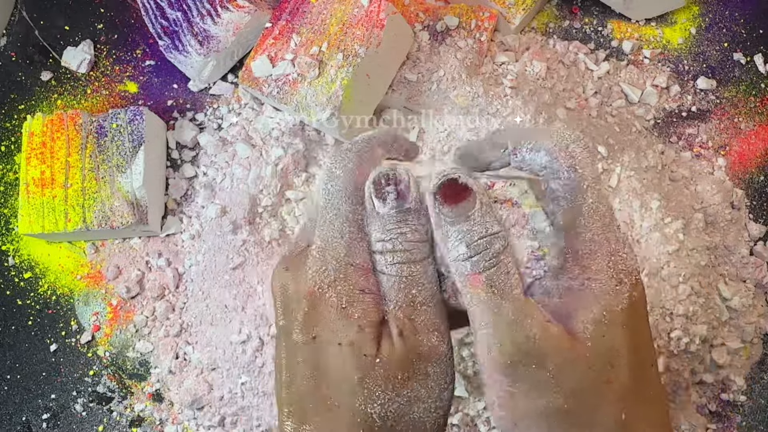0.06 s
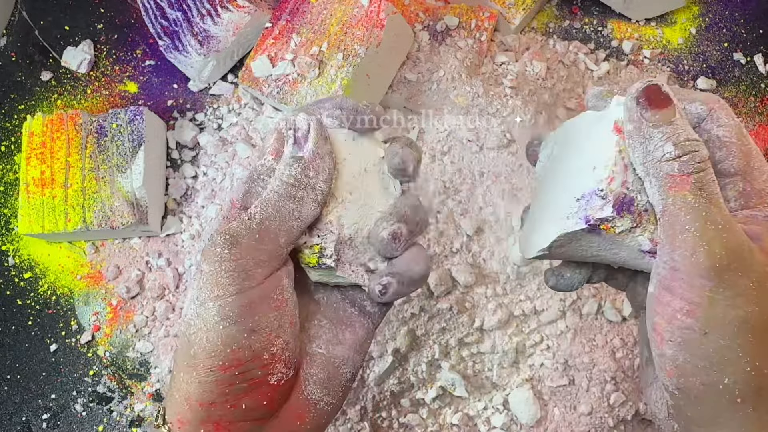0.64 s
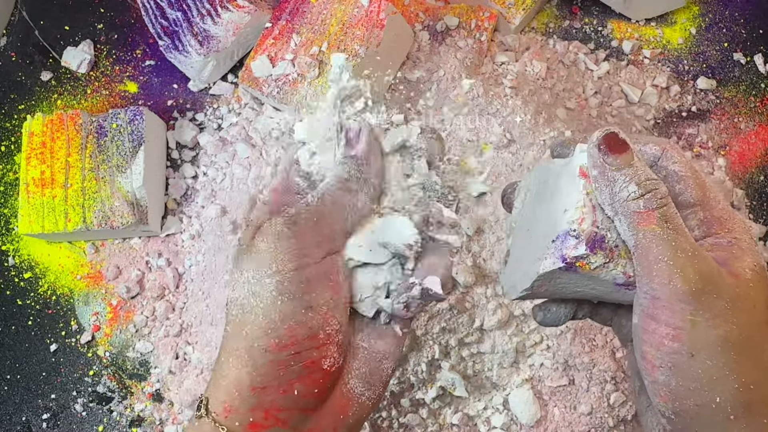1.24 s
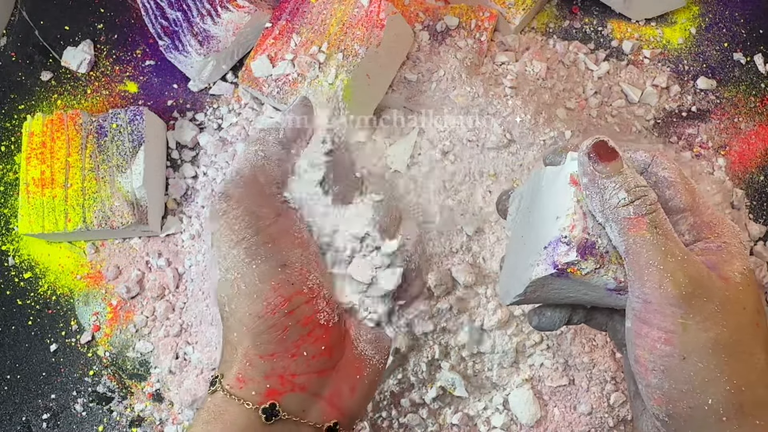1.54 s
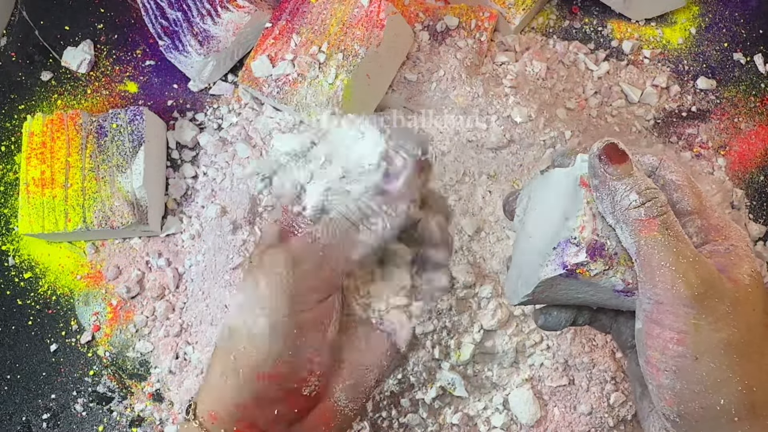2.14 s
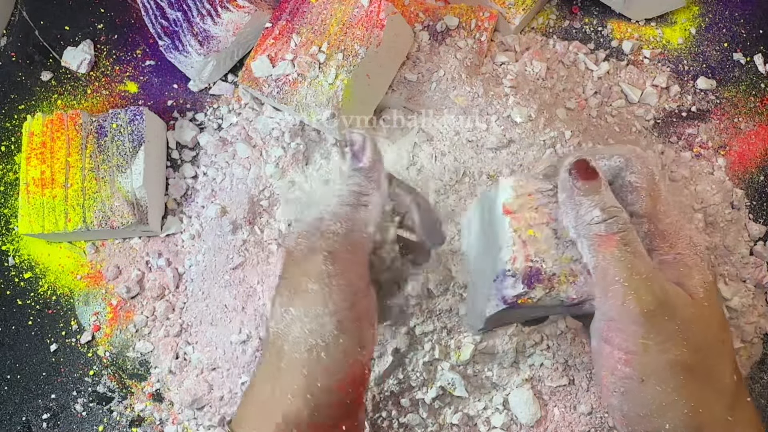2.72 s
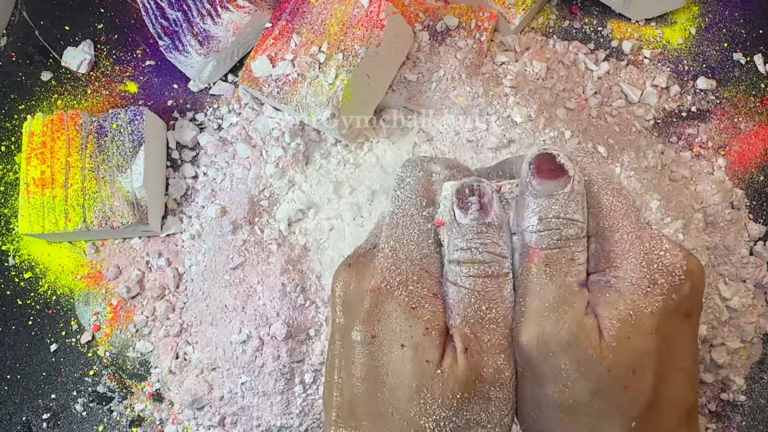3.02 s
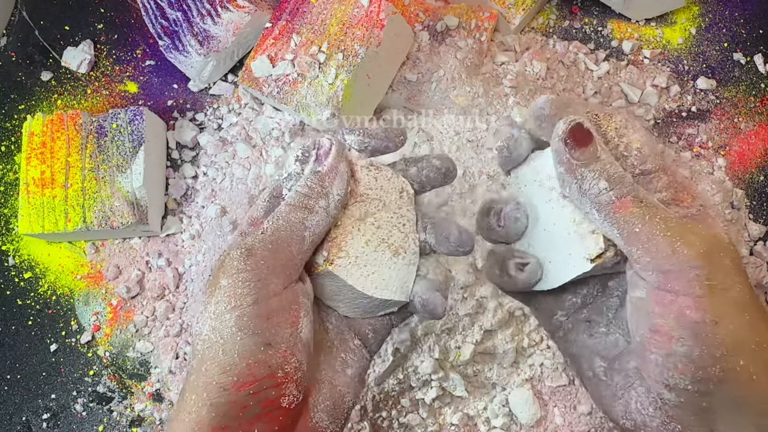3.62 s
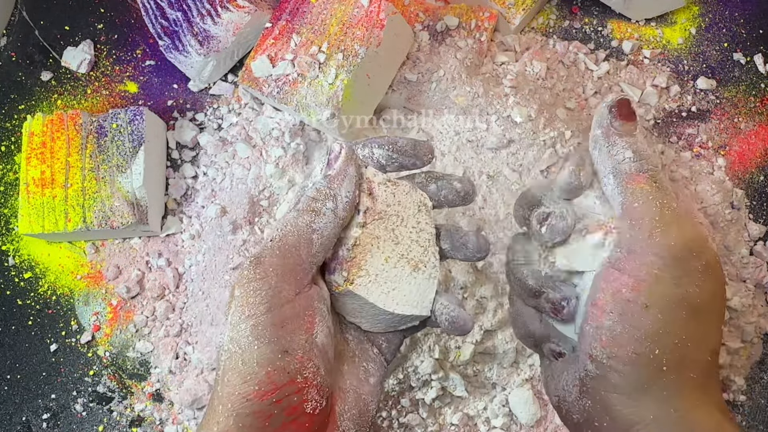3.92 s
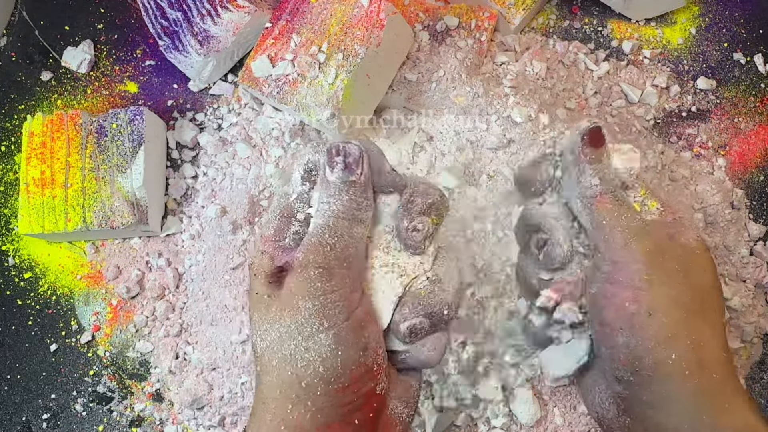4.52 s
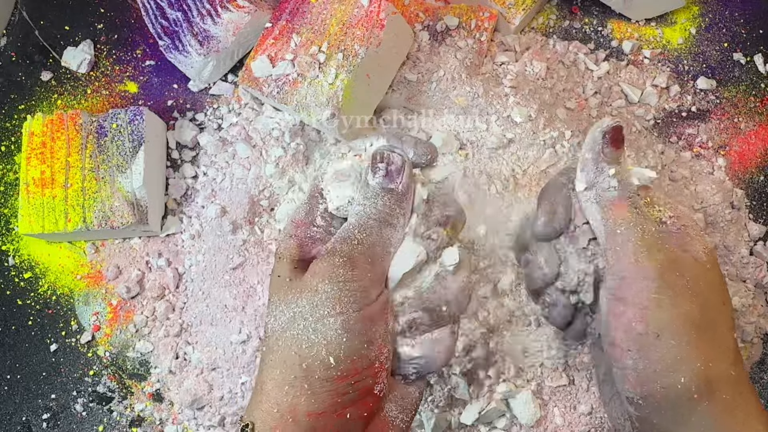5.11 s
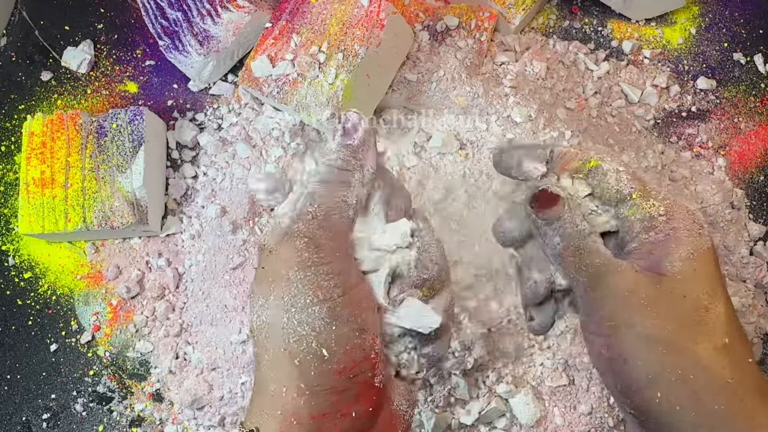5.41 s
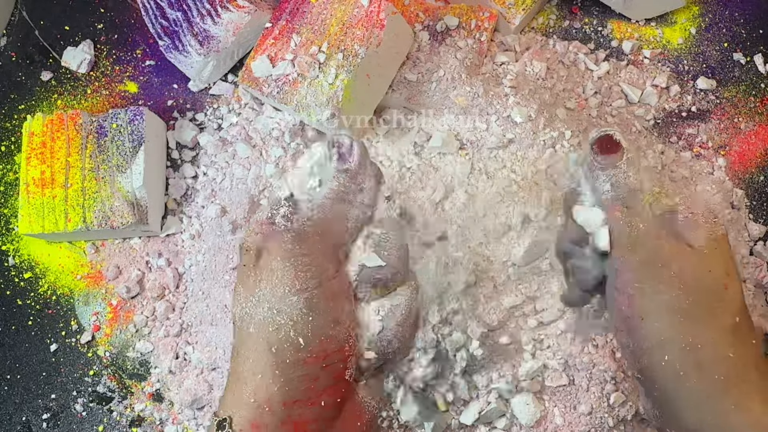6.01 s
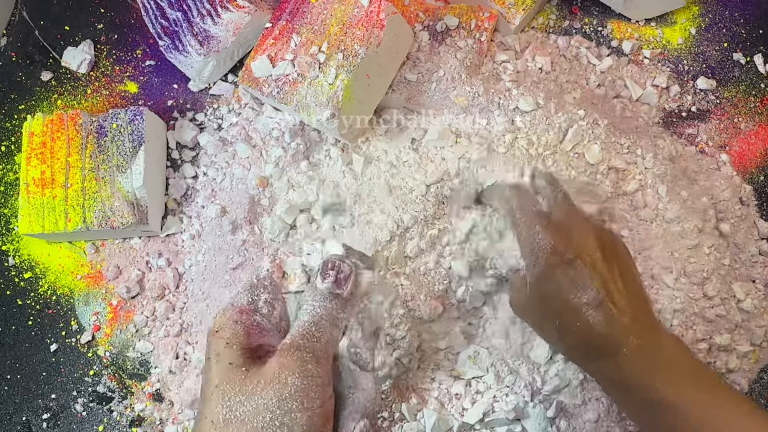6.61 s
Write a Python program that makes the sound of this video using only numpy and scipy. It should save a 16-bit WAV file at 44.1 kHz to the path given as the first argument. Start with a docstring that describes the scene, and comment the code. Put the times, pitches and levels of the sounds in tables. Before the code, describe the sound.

Hands snap dry chalk blocks close to a stereo microphone in a small, dead space. Sharp cracks with a hollow knock and a short low ring give way to gritty crunching as the pieces are squeezed, and lumps thud softly into powder. After a quieter spell of crumbling, another block snaps and dense crackling follows. At the end, fingers rake through the loose rubble.

```python
"""A small, dead space, with a stereo microphone close to a heap of chalk powder.
Two hands snap dry blocks and crumble the pieces: sharp cracks stand over a gritty crunch of tiny
fractures. Lumps thud into the powder, and at the end a hand rakes through the heap.
The space answers with one strong low ring, and the hardest snaps overload the microphone."""
import sys
import numpy as np
from scipy import signal
from scipy.io import wavfile
from scipy.ndimage import uniform_filter1d

SR = 44100
rng = np.random.default_rng(int(sys.argv[2]) if len(sys.argv) > 2 else 0)


def store_wav(level_fs):
    """Save 16-bit WAV to argv[1]."""
    pcm = np.round(np.clip(np.atleast_2d(level_fs), -1, 1) * 32767)
    wavfile.write(sys.argv[1], SR, pcm.T.astype(np.int16))


N = 297665  # sources are mid-side pairs; table levels are relative, ahead of each layer's gain

# The loudest cracks, close to the microphone: start_s, snap_db, knock_db
CRACKS = [(0.12, -16, -49), (0.1876, -24, -57), (0.2096, 8.5, -1), (0.634, -16, -30), (0.659, -11, -25),
          (0.6891, -4, -14.5), (0.6989, 3.5, -35), (0.7336, -8, -51), (0.7766, 4.5, -14),
          (0.7939, 0, -12.5), (0.8154, -7, -40), (0.8348, -9.5, -31), (0.8893, -16, -23.5),
          (0.8965, -5, -27), (0.9218, -3.5, -21), (1.046, -25, -28.5), (1.092, -17, -34.5),
          (1.3415, -28, -36), (1.3687, -7, -51), (1.4634, -26, -28), (1.4781, -2, -18), (1.985, -37, -34),
          (2.0785, -33, -31), (2.2666, -19, -26.5), (2.3085, -12.5, -22.5), (2.3349, -12.5, -20),
          (2.418, -39, -28), (2.5637, -27.5, -28), (2.722, -27, -37), (2.768, -14, -26.5),
          (2.977, -29, -36.5), (3.015, -20.5, -45), (3.1475, 1.5, -10.5), (3.3777, -20, -50),
          (3.5515, -19, -35), (3.6505, 0.5, -9.5), (3.6554, -6, -20), (3.7559, -2, -10),
          (3.7945, -5.5, -9.5), (3.8, -5, -13), (3.8242, 3.5, -9), (3.8864, -2, -24.5), (3.928, -9, -19),
          (3.9477, -1, -21), (3.9958, -8, -37), (4.0371, -14.5, -35), (4.2558, -24, -26.5),
          (4.294, -12.5, -37), (4.3966, 2.5, -8), (4.4088, 0, -7.5), (4.4816, 0.5, -15.5),
          (4.5425, 3, -18.5), (4.5607, 0, -17.5), (4.567, -0.5, -15), (4.7127, -30, -28.5),
          (4.994, -16.5, -18.5), (5.0653, -24, -28), (5.0843, -19, -24), (5.1095, -16, -20),
          (5.1141, -5.5, -17.5), (5.153, -15.5, -30), (5.2447, -15, -21), (5.2773, -13.5, -22.5),
          (5.3058, -12.5, -22.5), (5.4436, -18, -36), (5.463, -9.5, -16), (5.5561, -4.5, -11.5),
          (5.6877, -15, -39), (5.8713, -18, -23), (5.9254, -26, -23.5), (6.0332, -16, -30),
          (6.0787, -18, -45), (6.538, -12.5, -28.5), (6.6643, -14, -23.5), (6.724, -6, -18.5)]
# Tone of a snap at close range: frequency_hz, level_db
SNAP_SPECTRUM = [(300, -22), (1200, -10), (2700, -1), (4000, -1), (5000, -4), (6300, 1), (8500, -4),
                 (10000, -10), (12300, -21), (15500, -15)]

def snaps(cracks, spectrum, split_s=.0009, splinter_db=-10, splinter_s=.005, strain_db=-16, strain_s=.002):
    """The chalk crackles under strain, splits and sheds splinters; a thin flake goes in one short tick."""
    out = np.zeros((2, N))
    t = np.arange(-SR // 50, SR // 16) / SR  # the split falls at t = 0
    splinters = grains(per_s=900, spread_db=3, life_s=.0004, bed=.08)
    strain = amp(strain_db) * np.exp(-abs(t) / strain_s)
    shedding = np.where(t < 0, strain, amp(splinter_db) * np.exp(-abs(t) / splinter_s))
    for start_s, snap_db, knock_db in cracks:
        thickness = np.clip(amp(.3 * (knock_db + 18)), .4, 1.4)  # thicker pieces knock louder
        width_s = thickness * np.where(t < 0, split_s / 4, split_s)
        split = rng.choice([-1., 1.], (2, len(t))) * np.exp(-abs(t) / width_s) / np.sqrt(thickness)
        bits = splinters.take(round(start_s * SR) + np.arange(len(t)), axis=1, mode="wrap")
        add(out, start_s + t[0], amp(snap_db) * (split + thickness * shedding * bits))
    return colour(out, spectrum)


# Tone of the parting halves at close range: frequency_hz, level_db
KNOCK_SPECTRUM = [(100, -15.5), (250, -12), (600, -2.5), (1200, -1), (1550, -3.5), (2100, 3), (2900, -2.5),
                  (3700, -4.5), (6000, -14.5), (11000, -69)]

def knocks(cracks, level_db, life_s, scrape_db, scrape_s):
    """The halves spring apart with a falling knock, slower for big pieces, their rough faces scraping."""
    out, t = np.zeros((2, N)), np.arange(SR // 20) / SR
    for start_s, _, knock_db in cracks:
        size = np.clip(amp(.233 * (knock_db + 14.5)), .8, 2.2) * rng.uniform(.9, 1.1)
        knock = falling_tone(t, top_hz=3963, end_hz=508, fall_s=.0012 * size)
        knock *= np.exp(-t / (life_s * size))
        scrape = amp(scrape_db) * rng.standard_normal((2, len(t))) * np.exp(-t / scrape_s)
        add(out, start_s, amp(knock_db + level_db) * (np.outer([1, 0], knock) + scrape))
    return colour(out, KNOCK_SPECTRUM)


# Whole blocks breaking in front of the microphone: start_s, thock_db, push_db
BREAKS = [(0.2096, -4, -11), (0.69, -8, -22), (3.148, -1.5, -8), (3.651, -13, -23), (3.756, -14, -23),
          (3.796, -8, -25), (4.3966, -25, -22.5), (4.4088, -10, -24.5)]
# Hollow tone between the palms: frequency_hz, level_db
THOCK_SPECTRUM = [(150, -7), (400, -5), (520, 0.5), (640, 3.5), (800, 4.5), (1100, -1), (2000, -12.5),
                  (6000, -99)]

def thocks(level_db, life_s):
    """A whole block breaking between the palms adds a hollow thock."""
    out, t = np.zeros((2, N)), np.arange(SR // 12) / SR
    for start_s, thock_db, _ in BREAKS:
        burst = np.exp(-t / life_s) * rng.standard_normal((2, len(t)))
        add(out, start_s, amp(level_db + thock_db) * burst)
    return colour(out, THOCK_SPECTRUM)


def flakes(grit_flow, crumb_flow, per_s=16, snap_db=12, knock_db=2, spread_db=4.5):
    """Flakes crack off at random, as strong as the squeeze that sheds them; rows as in CRACKS."""
    rows = []
    for when, size, thickness in rng.random((round(per_s * N / SR), 3)):
        at = int(when * N)
        snap = 20 * np.log10(grit_flow[at]) + snap_db + spread_db * (2 * size - 1)
        knock = 20 * np.log10(crumb_flow[at]) + knock_db + spread_db * (2 * thickness - 1)
        rows.append((at / SR, snap, knock))
    return rows


# Squeezes of the hand above the heap: peak_s, half_length_s, grit_db, crumbs_db, heap_db
SQUEEZES = [(0.035, .06, -44, -54, -63), (0.451, 0.05, -41, -60, -51), (0.692, 0.076, -36.5, -41, -39.5),
            (0.813, 0.045, -27, -34, -35), (0.938, 0.036, -28, -30, -36), (1.171, .07, -39.5, -38.5, -53),
            (1.34, 0.067, -31, -34.5, -49), (1.484, 0.15, -40, -36.5, -36), (1.70, 0.11, -59, -56, -37),
            (1.877, 0.1, -41.5, -35.5, -42), (2.015, 0.14, -43.5, -40, -39.5),
            (2.313, 0.11, -41, -35.5, -34.5), (2.44, 0.059, -64, -39, -49),
            (2.561, 0.072, -44.5, -38.5, -48.5), (2.685, 0.07, -47.5, -53, -69),
            (2.809, 0.051, -42, -43.5, -45), (3.003, 0.045, -51, -47.5, -45.5),
            (3.433, 0.066, -41.5, -47.5, -58), (3.713, 0.09, -38.5, -37.5, -30.5),
            (3.917, 0.12, -34.5, -37, -32.5), (4.179, 0.031, -34.5, -33.5, -37.5),
            (4.27, 0.086, -37, -36.5, -52), (4.473, 0.16, -34.5, -33, -32.5), (4.742, .13, -38, -37, -33),
            (4.963, 0.12, -38.5, -35, -57), (5.113, 0.073, -39.5, -36, -38),
            (5.288, 0.073, -35, -38.5, -39.5), (5.47, 0.14, -42.5, -38.5, -42),
            (5.73, 0.37, -44, -40, -43.5), (5.962, 0.15, -38.5, -39.5, -35.5),
            (6.208, 0.064, -46.5, -39, -33), (6.4, 0.069, -43.5, -36.5, -35), (6.68, 0.17, -46.5, -39, -37)]

def squeezing(layer, touch_db, late_s=0, stretch=1, build_db=9, let_go_db=8, bend=1.55):
    """Flow of grit (layer 0), crumbs (1) or heap unrest (2) as each squeeze builds and lets go."""
    t = np.arange(N // 64 + 2) * 64 / SR
    power = amp(touch_db) ** 2  # fingers never lie quite still on the chalk
    for peak_s, half_length_s, *levels_db in SQUEEZES:
        from_peak = (t - peak_s - late_s) / (half_length_s * stretch)
        drop_db = np.where(from_peak < 0, build_db, let_go_db) * abs(from_peak) ** bend
        power = power + amp(levels_db[layer] - drop_db) ** 2
    return np.interp(np.arange(N) / SR, t, np.sqrt(power))


def spilling(level_db=-25.5, trickle_s=.079):
    """Flow of crumbs that trickle from a freshly broken block."""
    flow, t = np.zeros(N), np.arange(SR) / SR
    for start_s, thock_db, _ in BREAKS:
        add(flow, start_s, amp(thock_db + level_db) * np.exp(-t / trickle_s))
    return flow


# Bright, fine grit at close range: frequency_hz, level_db
GRIT_SPECTRUM = [(500, -9.5), (2000, -4.5), (3000, 1.5), (4200, 5), (5000, -0.5), (6300, 4.5), (8000, 1),
                 (9800, -4.5), (11700, -47), (15300, -8.5)]
# Duller, coarse crumbs at close range: frequency_hz, level_db
CRUMB_SPECTRUM = [(200, 3.5), (600, -3), (1000, 1.5), (1500, -1), (2100, 3.5), (2800, 2), (3600, -6.5),
                  (6000, -10.5), (12000, -49.5)]

def crumbling(grit_flow, crumb_flow, crumbs_db, clump_db):
    """Squeezed chalk gives way in uneven spurts of fine grit and coarser crumbs."""
    grit = unit_rms(colour(grains(per_s=420, spread_db=4.5, life_s=.0028, bed=.71), GRIT_SPECTRUM))
    crumbs = unit_rms(colour(grains(per_s=230, spread_db=3, life_s=.0014, bed=1), CRUMB_SPECTRUM))
    spurts = unit_rms(uniform_filter1d(uniform_filter1d(rng.standard_normal(N), size=500), size=300))
    stream = grit * grit_flow + amp(crumbs_db) * crumbs * crumb_flow
    return amp(clump_db * spurts) * stream


# Lumps landing in the powder below the hands: time_s, level_db
THUDS = [(0.055, -29), (0.208, -15.5), (0.683, -26.5), (1.088, -17), (3.149, -18.5), (3.568, -21),
         (4.403, -31), (4.713, -20), (5.86, -17.5)]

def thuds(level_db, swell_s, scuff_db, scuff_s):
    """A lump scuffs the rubble and sinks into the powder: a soft thud that falls in pitch."""
    lumps, scuffs, t = np.zeros((2, N)), np.zeros((2, N)), np.arange(SR // 8) / SR
    sink, touch = (t / peak_s * np.exp((1 - (t / peak_s) ** 2) / 2) for peak_s in (swell_s, scuff_s))
    thud = sink * falling_tone(t, top_hz=615, end_hz=62, fall_s=.0099)
    for time_s, lump_db in THUDS:
        add(lumps[0], time_s - .006, amp(lump_db + level_db) * thud)
        add(scuffs, time_s - .01, amp(lump_db + scuff_db) * touch * rng.standard_normal((2, len(t))))
    return ringing(lumps + colour(scuffs, HEAP_SPECTRUM), ring_db=-16.5)


# One stroke of the fingers through the nearby heap: time_s, level_db
RAKE_STROKE = [(6.28, -44), (6.36, -33), (6.50, -32), (6.58, -33), (6.68, -43), (6.74, -50)]

def rake_stroke():
    """Strength of the stroke as the fingers dig in and ease off."""
    t = np.arange(N) / SR
    time_s, level_db = np.transpose(RAKE_STROKE)
    return amp(np.interp(t, time_s, level_db)) * (t > time_s[0])


# Tone of loose rubble on the heap: frequency_hz, level_db
RUBBLE_SPECTRUM = [(150, -11.5), (330, -9), (800, 8.5), (1400, -10), (2400, -10), (4000, -14), (9000, -58)]

def rake(stroke, level_db):
    """Loose pieces tumble over one another under the fingers."""
    rubble = unit_rms(colour(grains(per_s=760, spread_db=1.5, life_s=.003, bed=.28), RUBBLE_SPECTRUM))
    return ringing(amp(level_db) * stroke * rubble, ring_db=-3)


# Muffled tone of the powder heap: frequency_hz, level_db
HEAP_SPECTRUM = [(60, -6.5), (130, -1.5), (220, -9.5), (350, 1.5), (500, 5.5), (800, -5.5), (1400, -11.5),
                 (3000, -34), (9000, -65)]

def heap(unrest, level_db):
    """Fingers and falling crumbs shift the heap: dull bumps that keep the low ring alive."""
    bumps = colour(grains(per_s=180, spread_db=5.5, life_s=.0007, bed=.33), HEAP_SPECTRUM)
    return amp(level_db) * unit_rms(ringing(bumps, ring_db=-11.5)) * unrest


def booms(break_db, crack_db, delay_s):
    """A breaking block pushes enough air to set the space ringing; other cracks only nudge it."""
    pushes = np.zeros((2, N))
    for events, gain_db in (BREAKS, break_db), (CRACKS, crack_db):
        for start_s, _, push_db in events:
            add(pushes, start_s + delay_s, amp(gain_db + push_db) * np.array([[1], [0]]))
    return convolve(pushes, ring_response())


# Resonances of the space around the heap: pitch_hz, level_db, t60_s
SPACE_MODES = [(338.5, 8.5, 0.21), (383, -4, 0.2), (491, -6, 0.17), (533, -9, 0.064), (647, -27, 0.51),
               (782, -25.5, 0.26), (966, -20, .15), (1192, -18.5, 0.27), (1840, -7, 0.13),
               (2050, -5, 0.073)]

def ring_response():
    """The modes of the space as dying sines, with energy 1."""
    t = np.arange(SR // 3) / SR
    ring = sum(amp(db - 60 * t / t60_s) * np.sin(2 * np.pi * hz * t) for hz, db, t60_s in SPACE_MODES)
    return ring / np.linalg.norm(ring)


def ringing(x, ring_db):
    """A sound plus the ring of the space, heard dead centre."""
    return x + amp(ring_db) * convolve(x, ring_response()) * [[1], [0]]


# Decay of the space around the microphone: frequency_hz, t60_s
ROOM_DECAY = [(200, 1), (600, 0.21), (1400, 0.2), (2700, 0.23), (5000, 0.2), (9000, 0.27), (12000, 0.01)]

def room(x, early_db, early_s, tail_db, echoes_per_s=6000):
    """Close surfaces throw back a quick cluster of echoes; a short tail follows."""
    t = np.arange(SR // 3) / SR
    echoes = rng.choice([-1., 1.], (2, len(t)))
    echoes *= (rng.random((2, len(t))) < echoes_per_s / SR) * (t > .002)
    early = echoes * np.exp(-t / early_s)
    hz, frame_s, bands = signal.stft(echoes, SR, nperseg=256)
    decay = amp(-60 * frame_s / at_frequency(ROOM_DECAY, hz)[:, None])
    tail = signal.istft(bands * decay, SR, nperseg=256)[1][:, :len(t)]
    early *= amp(early_db) / np.linalg.norm(early[0])
    tail *= amp(tail_db) / np.linalg.norm(tail[0])
    return convolve(x, early + tail)


# Deep tone of the low rumble, with steady hum lines near 60 and 100 Hz: frequency_hz, level_db
SURFACE_SPECTRUM = [(15, -27), (32, -33), (48, -3.5), (60, 0.5), (75, -7.5), (100, -0.5), (130, -24.5),
                    (220, -19.5), (500, -24.5), (3000, -91)]

def rumble(unrest, level_db, floor_db):
    """The work surface rumbles faintly under the hands, more when the heap shifts."""
    surface = unit_rms(colour(rng.standard_normal((2, N)), SURFACE_SPECTRUM))
    return surface * np.hypot(amp(floor_db), amp(level_db) * unrest)


def grains(per_s, spread_db, life_s, bed):
    """Tiny fractures: random bursts, mostly small, over a bed of rubbing."""
    sizes = amp(spread_db * np.minimum(rng.exponential(1, N), 3.5))
    fractures = sizes * (rng.random(N) < per_s / SR)
    power = signal.lfilter([1], [1, -np.exp(-2 / (life_s * SR))], fractures ** 2)
    return np.sqrt(power / power.mean() + bed) * rng.standard_normal((2, N))


def falling_tone(t, top_hz, end_hz, fall_s):
    """A sine that drops quickly in pitch and levels out."""
    pitch_hz = end_hz + (top_hz - end_hz) * np.exp(-t / fall_s)
    return np.sin(2 * np.pi * np.cumsum(pitch_hz) / SR)


def colour(x, spectrum, size=4096):
    """Minimum-phase filter with the given spectrum, so that attacks stay sharp."""
    log_gain = np.log(amp(at_frequency(spectrum, abs(np.fft.fftfreq(size, 1 / SR)))))
    response = np.fft.ifft(np.exp(np.conj(signal.hilbert(log_gain)))).real
    return convolve(x, response[:size // 2])


def at_frequency(table, hz):
    """Reads a table along a log-frequency axis."""
    table_hz, values = np.transpose(table)
    return np.interp(np.log(hz + 1), np.log(table_hz + 1), values)


def convolve(x, response):
    """Passes each channel through a response."""
    return signal.oaconvolve(x, np.atleast_2d(response), axes=1)[:, :N]


def add(mix, start_s, sound):
    """Mixes a sound in at start_s."""
    part = mix[..., max(round(start_s * SR), 0):][..., :sound.shape[-1]]
    part += sound[..., :part.shape[-1]]


def amp(db):
    """Decibels to gain."""
    return 10 ** (np.asarray(db) / 20)


def unit_rms(x):
    """Scales to rms 1."""
    return x / np.sqrt(np.mean(x ** 2) + 1e-20)


# Stereo width at the microphone, narrow in the bass and wide on top: frequency_hz, side_gain_db
STEREO_WIDTH = [(60, -23), (300, -14), (700, -7), (1100, -9), (1850, -14), (2500, -4), (3600, -5),
                (5000, 1), (6000, -6), (8000, 1), (10000, 7), (12500, 11), (15500, 2)]

def scene():
    """Cracks, crunch and low sounds meet at the close microphone, as left and right."""
    grit_flow = squeezing(layer=0, touch_db=-55.5)
    crumb_flow = np.hypot(squeezing(layer=1, touch_db=-55), spilling())
    stroke = rake_stroke()
    # the heap answers once the crumbs have fallen, and stays restless for longer than the squeeze
    settling = squeezing(layer=2, touch_db=-60.5, late_s=.013, stretch=1.28)
    unrest = np.hypot(settling, amp(7) * stroke)
    flake_cracks = flakes(grit_flow, crumb_flow)
    cracks = snaps(CRACKS, SNAP_SPECTRUM) + snaps(flake_cracks, GRIT_SPECTRUM)
    cracks += knocks(list(CRACKS) + flake_cracks, level_db=9, life_s=.0017, scrape_db=.5, scrape_s=.0034)
    cracks += thocks(level_db=10.5, life_s=.0057)
    cracks += room(cracks, early_db=-9, early_s=.0045, tail_db=-13.5)
    crunch = crumbling(grit_flow, crumb_flow, crumbs_db=-1.5, clump_db=2) + rake(stroke, level_db=-2.5)
    crunch += room(crunch, early_db=-18, early_s=.004, tail_db=-17)
    lows = booms(break_db=31, crack_db=10, delay_s=.002)
    lows += thuds(level_db=-9.5, swell_s=.028, scuff_db=2.5, scuff_s=.014)
    lows += heap(unrest, level_db=-2.5) + rumble(unrest, level_db=-4, floor_db=-45)
    chalk = cracks + crunch + lows
    mid, side = chalk[0], colour(chalk[1:], STEREO_WIDTH)[0]
    return np.array([mid + side, mid - side])


def limiter(x, knee_db, share, recover_db_per_s):
    """The recorder turns down by a share of the overload just after it, and soon recovers."""
    over_db = np.maximum(20 * np.log10(abs(x).max(0) + 1e-9) - knee_db, 0)
    recovery_db = np.arange(N) * recover_db_per_s / SR
    held_db = np.maximum.accumulate(over_db + recovery_db) - recovery_db
    lagging_db = signal.lfilter([.005], [1, -.995], held_db)  # about 4.5 ms to react
    return x / amp(share * lagging_db)


def record(dry):
    """The microphone cuts deep bass; the hardest snaps outrun the limiter and clip; the top is cut."""
    heard = signal.sosfilt(signal.butter(4, 36, "highpass", fs=SR, output="sos"), dry)
    clipped = np.clip(limiter(heard, knee_db=7, share=.38, recover_db_per_s=94), -1, 1)
    low_pass = signal.firwin(255, cutoff=16200, window=("kaiser", 9), fs=SR)
    return signal.oaconvolve(clipped, low_pass[None], "same", axes=1)


dry = scene()
out = record(dry)
store_wav(out)
```